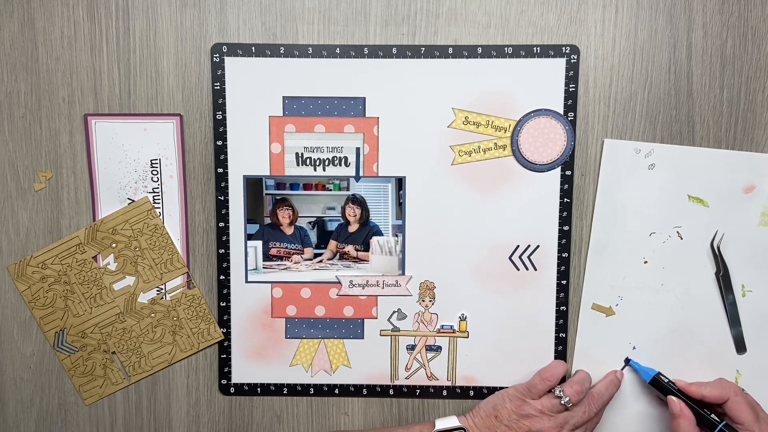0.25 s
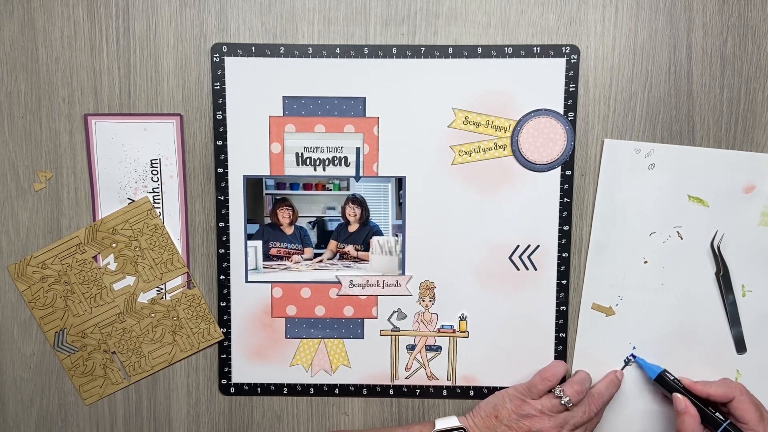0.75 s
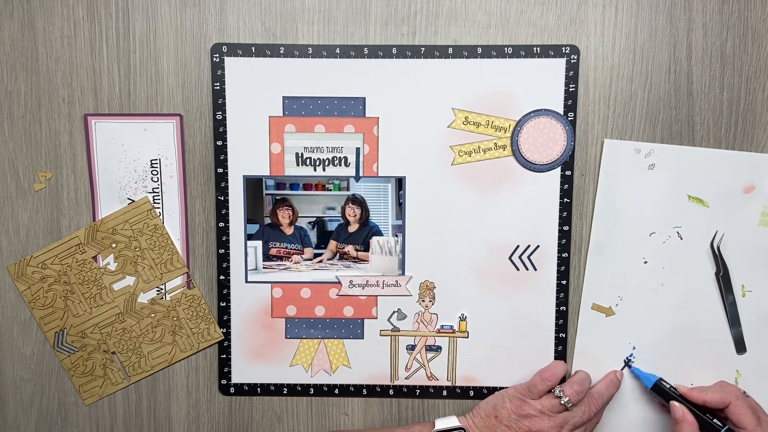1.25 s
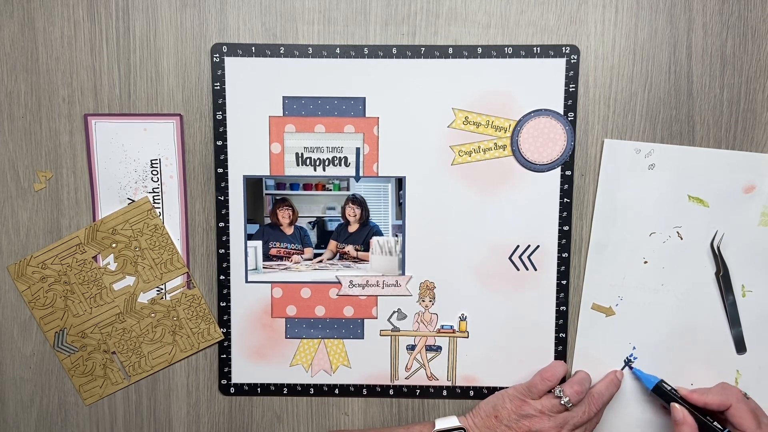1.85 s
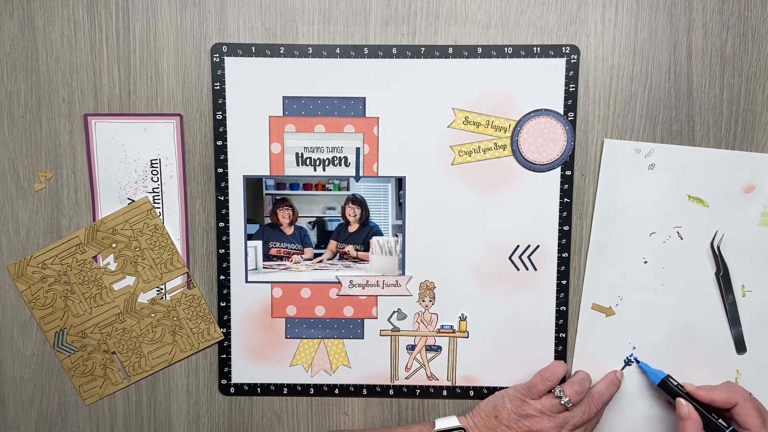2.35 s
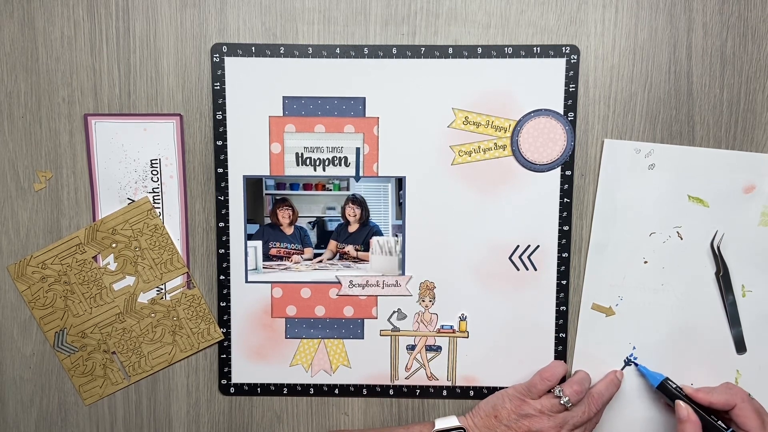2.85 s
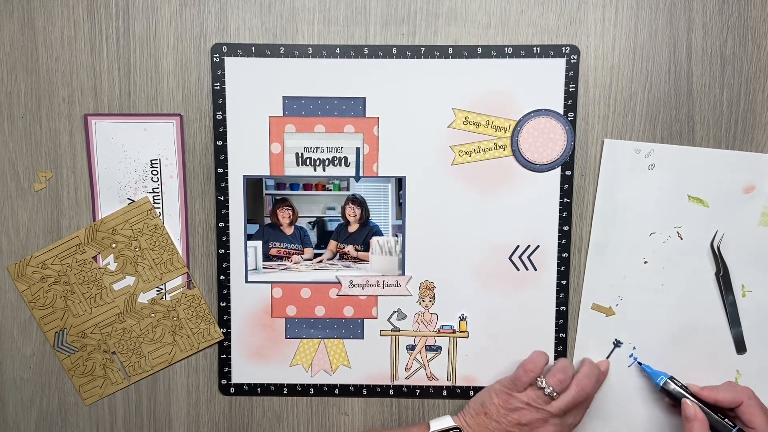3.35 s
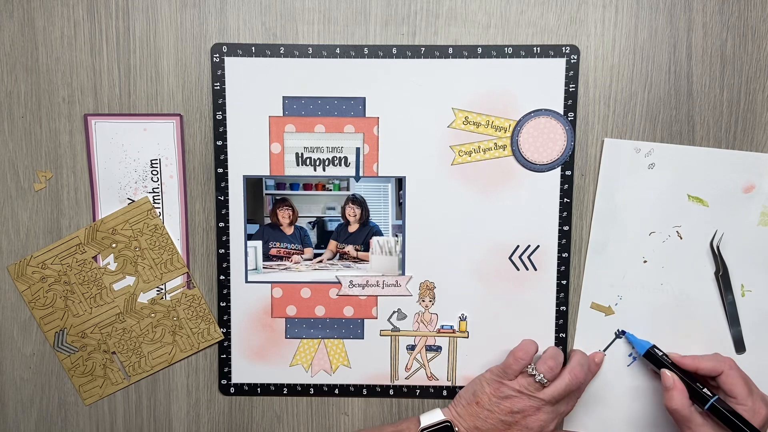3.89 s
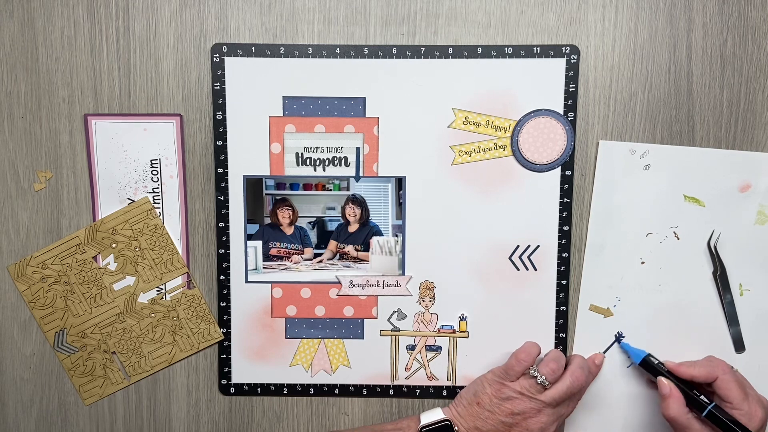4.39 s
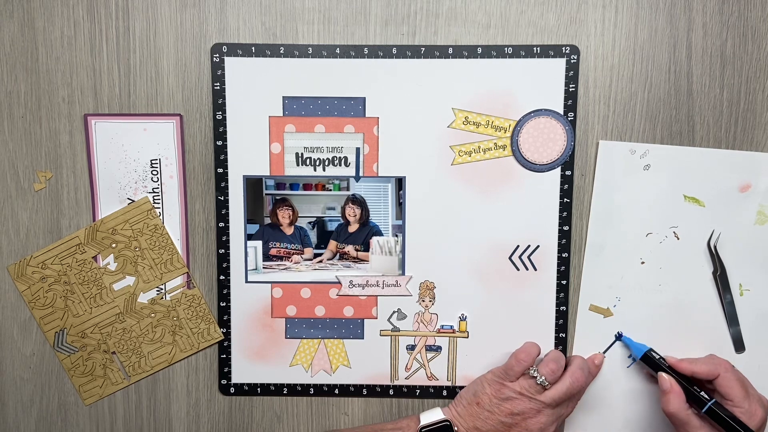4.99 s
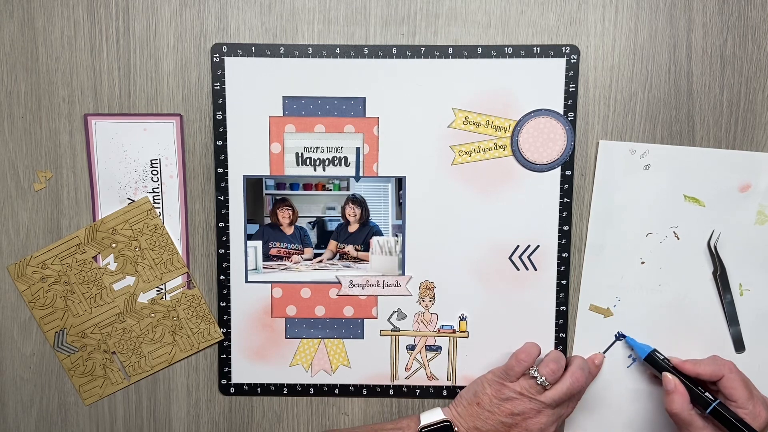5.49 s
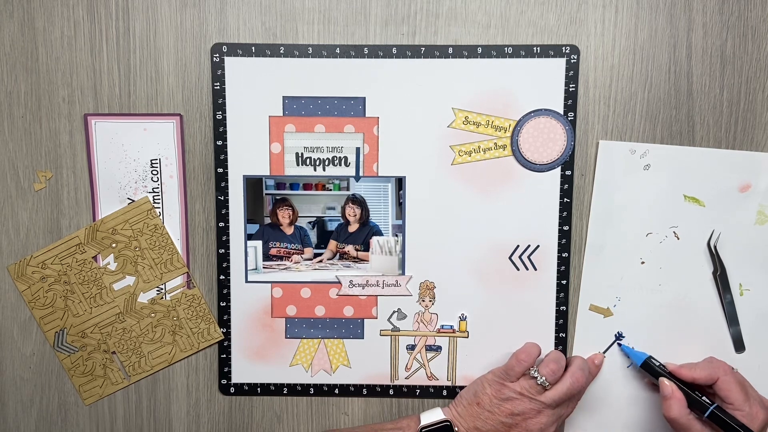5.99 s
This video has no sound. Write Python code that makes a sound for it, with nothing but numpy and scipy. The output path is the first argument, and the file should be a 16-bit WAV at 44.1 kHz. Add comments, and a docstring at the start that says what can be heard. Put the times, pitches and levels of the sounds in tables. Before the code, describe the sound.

A quiet small room, heard closely in stereo at a desk: a constant low hum near 120 Hz beats almost three times a second over soft ventilation rumble and faint hiss. From 0 to 2 s a felt tip dabs paper about five times a second, each a tiny dry scratch with gritty snags, some shaking the sheet, with low desk thuds and faint skin rubs. From 2 to 3 s the dabs weaken; a firmer one lands at 3.1 s, followed by light, bright strokes until 3.5 s. Around 3.55 to 4.1 s a hand drags the paper: dull rubbing, crackles and small snaps, clustered near 3.6 and 3.95 s. At 4.08 s one sharp plastic click stands out. From 4.3 to 4.95 s quick back-and-forth strokes hiss, roughly ten a second, fading to faint touches by 5.4 s. Separate scratches return from 5.55 s to the end at about 6.2 s.

```python
"""A felt marker colours a small paper cut-out on a sheet lying on a desk, in short dabs and a quick back-and-forth:
fibres catching on the paper hiss, snags ring the tip, firm dabs shake the sheet, and dull rubs lie beneath.
Midway a hand drags the paper along, which rubs, crackles and snaps, and the pen gives one sharp click.
Behind it two motors hum and beat against each other over ventilation rumble and hiss in the small room.
A closely spaced microphone pair listens, its stand carrying low thuds straight up from the desk."""
import sys
import numpy as np
from scipy import signal
from scipy.fft import rfft, irfft, next_fast_len
from scipy.io import wavfile

SR = 44100
rng = np.random.default_rng(int(sys.argv[2]) if len(sys.argv) > 2 else 0)


def materialize(psi):
    """Save the field psi as 16-bit PCM at rate SR to the path in sys.argv[1].

    A 1-D psi becomes a single channel; in a 2-D psi each row is a channel.
    """
    bounded = np.clip(np.atleast_2d(psi).T, -1, 1)
    quanta = np.round(bounded * 32767).astype(np.int16)
    wavfile.write(sys.argv[1], SR, quanta)


N = 274917
TIME = np.arange(N) / SR
SIZE = next_fast_len(N + SR // 2)
BINS_HZ = np.maximum(np.arange(SIZE // 2 + 1) * SR / SIZE, 1)


def from_db(db):
    """Decibels to gain."""
    return 10 ** (np.asarray(db) / 20)


def rms_one(x):
    """Scale to unit rms."""
    return x / np.sqrt(np.mean(x ** 2) + 1e-20)


def through(x, response):
    """Filter by a complex frequency response."""
    return irfft(rfft(x, SIZE) * response, SIZE)[..., :N]


def cut(x, hz, kind):
    """Second-order high- or low-pass."""
    return signal.sosfilt(signal.butter(2, hz, kind, fs=SR, output="sos"), x)


def coloured(x, points, skirt_db=14):
    """Shape by a (Hz, dB) spectrum that falls away per octave beyond its ends; rms 1."""
    hz, db = np.transpose(points)
    octave = np.log2(BINS_HZ)
    beyond = np.abs(octave - np.clip(octave, np.log2(hz[0]), np.log2(hz[-1])))
    shape_db = np.interp(octave, np.log2(hz), db) - skirt_db * beyond
    return rms_one(through(x, from_db(shape_db)))


def drift(per_s):
    """Random wander with spread about 1: straight lines between per_s random knots a second."""
    knots = rng.standard_normal(N // 20)
    return np.interp(TIME * per_s, np.arange(len(knots)), knots) * np.sqrt(1.5)


def bend(x, share, per_s):
    """Let the pitches in a sound wander by a small share."""
    position = np.cumsum(1 + share * drift(per_s)) % N
    return np.interp(position, np.arange(N), x)


def grains(per_s, spread_db):
    """Fibres let go at random moments with uneven force; rms 1."""
    force = from_db(spread_db * np.minimum(rng.exponential(1, N), 4))
    sign = rng.choice([-1, 1], N)
    return rms_one(force * sign * (rng.random(N) < per_s / SR))


def resonate(x, modes, struck=False):
    """Parallel resonances: unit gain on top, or unit ring height when struck, times each mode's level."""
    out = 0
    for hz, width, db in modes:
        radius, angle = np.exp(-np.pi * width / SR), 2 * np.pi * hz / SR
        b = np.array([1, 0, -1]) / 2 * (1 if struck else 1 - radius * radius)
        a = [1, -2 * radius * np.cos(angle), radius * radius]
        out = out + from_db(db) * signal.lfilter(b, a, x + 1e-18)
    return out


def contacts(rows, crumble, crumble_s):
    """A pulse for each contact, trailed by a short burst of micro-slips."""
    out, age = np.zeros(N), np.arange(SR // 20) / SR
    for s, db in rows:
        burst = crumble * rng.standard_normal(len(age)) * np.exp(-age / crumble_s)
        burst[0] = 1
        at = round(s * SR)
        out[at:at + len(age)] += from_db(db) * burst[:N - at]
    return out


def swell(start, length, attack, release):
    """Speed of one movement: rounded attack, hold, rounded release."""
    out, during = np.zeros(N), slice(*np.searchsorted(TIME, [start, start + length]))
    rise = (TIME[during] - start) / attack
    fall = (start + length - TIME[during]) / release
    out[during] = np.sin(np.pi / 2 * np.clip(np.minimum(rise, fall), 0, 1))
    return out


# spectrum of the ventilation rumble: f/Hz, relative level per Hz/dB
RUMBLE_COLOUR = [(22, -30), (38, -1), (58, -5.5), (75, 4.5), (95, 1.5), (150, -3), (190, -12.5), (300, -16),
                 (450, -23.5)]
# spectrum of the hiss shared by both microphones: f/Hz, relative level per Hz/dB
HISS_COLOUR = [(150, 1.5), (400, 5.5), (800, -5), (1300, -0.5), (2200, -16.5), (3500, -17.5), (5000, -19.5),
               (7000, -21.5), (10000, -23), (16000, -30.5)]
# spectrum of the hiss that differs between the microphones: f/Hz, relative level per Hz/dB
HISS_SIDE_COLOUR = [(40, -5.5), (120, -5.5), (220, -1), (400, 4), (750, 2), (1200, -0.5), (1900, -18.5),
                    (3000, -8), (6000, -45)]


def air(rumble_db=-60.5, hiss_db=-74.0, side_db=-74.0, gust_db=2, gust_below_hz=85, waver_db=1.2):
    """Ventilation rumble, central and gusty in its depths, under a faint hiss: wavering centre, steady sides."""
    rumble = from_db(rumble_db) * coloured(rng.standard_normal(N), RUMBLE_COLOUR)
    deep = through(rumble, 1 / (1 + (BINS_HZ / gust_below_hz) ** 8))
    rumble = rumble - deep + deep * from_db(gust_db * drift(8))
    mid = from_db(hiss_db) * coloured(rng.standard_normal(N), HISS_COLOUR) * from_db(waver_db * drift(8))
    side = from_db(side_db) * coloured(rng.standard_normal(N), HISS_SIDE_COLOUR)
    return rumble + mid + side * [[1], [-1]]


# steady hum tones, strongest first: f/Hz, rms level/dB before throb and waver
HUM_TONES = [(120.1, -48), (59.3, -67.5), (242, -77)]
BEAT_HZ, BEAT_CREST_S = 2.765, .06


def hum(second_db=-59.0, throb=0.058, waver_db=0.69):
    """Mains hum; a second motor runs slightly faster, so the two beat."""
    since = TIME - BEAT_CREST_S
    mains = sum(from_db(db) * np.cos(2 * np.pi * hz * since) for hz, db in HUM_TONES)
    second = from_db(second_db) * np.cos(2 * np.pi * (HUM_TONES[0][0] + BEAT_HZ) * since)
    # the beat has flat crests and narrow troughs
    shape = 1 - throb * np.cos(4 * np.pi * BEAT_HZ * since) / 2
    return np.sqrt(2) * (mains + second) * shape * from_db(waver_db * drift(8))


# the hands press the desk: t/s, level/dB before trim
DESK_PRESSES = [(.105, -57), (.33, -67), (.575, -53), (.78, -45.5), (.955, -46.5), (1.14, -54), (1.31, -57),
                (1.5, -46), (1.71, -47), (1.965, -57), (2.36, -61), (2.545, -55)]
# the desk's lowest mode: f/Hz, width/Hz, level/dB
DESK_LOWEST_MODE = [(49, 13, 1.5)]


def desk_thuds(thud_db=3, dull_hz=80):
    """The desk's lowest mode is carried straight up the microphone stand."""
    presses = contacts(DESK_PRESSES, crumble=0, crumble_s=1)
    ring = resonate(presses, DESK_LOWEST_MODE, struck=True)
    return from_db(thud_db) * cut(cut(ring, dull_hz, "low"), 33, "high")


# the pen's click: t/s, level/dB before trim
CLICK_BLOW = [(4.0811, -6)]
# broad resonances of the pen: f/Hz, width/Hz, level/dB
PEN_RESONANCES = [(3270, 900, -4), (5600, 990, 1), (7000, 1200, -4), (8990, 1200, 1), (11200, 1500, -2.5),
                  (13540, 1800, -1)]


def pen_click(crack_hz=7000, gain_db=-0.5):
    """Hard plastic: a broadband snap, lifted by broad resonances that die within milliseconds."""
    blow = contacts(CLICK_BLOW, crumble=.075, crumble_s=.0022)
    snap = signal.sosfilt(signal.butter(1, crack_hz, "high", fs=SR, output="sos"), blow)
    for mode in PEN_RESONANCES:
        snap = snap + resonate(snap, [mode])  # each lifts the sound left by the one before
    return from_db(gain_db) * snap


# faint rubs and scuffs of skin on paper: centre t/s, length t/s, pitch f/Hz, width/Hz, level/dB before trim
SKIN_RUBS = [(0.25, .1, 1290, 400, -75.5), (0.299, .035, 1260, 220, -65), (0.398, .14, 2600, 696, -71),
             (0.427, .22, 328, 594, -66), (0.48, .12, 1400, 500, -72.5), (0.628, 0.023, 1380, 170, -69),
             (0.68, .1, 1400, 250, -77.5), (0.97, .12, 358, 248, -68.5), (1.868, .035, 1367, 110, -72),
             (1.938, .1, 1470, 300, -73), (2.59, 0.041, 1370, 400, -66.5), (2.818, 0.045, 1310, 350, -71.5),
             (3.892, .05, 700, 200, -66.5), (4.01, .06, 594, 199, -67.5), (4.15, .14, 650, 600, -72),
             (5.368, 0.085, 1250, 498, -70.5), (5.43, .14, 1380, 900, -76), (5.724, .06, 1240, 400, -74)]


def rubs(rub_db=-1.5):
    """Skin that sticks and slips: a fingertip scuffs briefly around one pitch, the palm rubs broad and low."""
    out, friction = np.zeros(N), grains(per_s=3000, spread_db=2)
    for centre, length, hz, width, db in SKIN_RUBS:
        mode, near = [(hz, width, 0)], np.abs(TIME - centre) < .5
        speed = swell(centre - length / 2, length, length / 2, length / 2)[near]
        tone = rms_one(resonate(resonate(friction[near], mode), mode))
        out[near] += from_db(db + rub_db) * speed * tone
    return out


# paper snaps under the fingers: t/s, level/dB and bright crack level/dB, both before trims
PAPER_SNAPS = [(3.578, -66, -35.5), (3.593, -39.5, -28), (3.597, -38, -50), (3.643, -50, -40),
               (3.678, -65, -42), (3.737, -47.5, -49), (3.747, -46, -46), (3.775, -39.5, -45),
               (3.801, -43, -51), (3.888, -51, -57), (3.936, -38, -42), (3.94, -39.5, -27.5),
               (3.947, -47.5, -28), (3.95, -41, -38)]
# resonances of the paper, heard in snaps and crackle: f/Hz, width/Hz, relative level/dB
PAPER_RESONANCES = [(1264, 97, -6.5), (1512, 410, 5.5), (2300, 350, 5.5), (2800, 400, 0.5), (3840, 240, -8),
                    (5100, 1000, -3.5), (6170, 190, -10)]


def snaps(snap_db=-18, crack_db=-3, vary_db=3, dull_hz=6500):
    """The paper buckles: each snap is a crack and rings the modes with strengths of its own."""
    strengths = vary_db * rng.standard_normal((len(PAPER_SNAPS), len(PAPER_RESONANCES)))
    rings = 0
    for mode, extras in zip(PAPER_RESONANCES, strengths.T):
        rows = [(s, db + extra) for (s, db, _), extra in zip(PAPER_SNAPS, extras)]
        buckles = contacts(rows, crumble=0.17, crumble_s=0.003)
        rings = rings + resonate(buckles, [mode], struck=True)
    cracks = contacts([(s, db) for s, _, db in PAPER_SNAPS], crumble=0.081, crumble_s=0.0028)
    cracks = cut(cut(cracks, 2200, "high"), 8000, "low")
    return from_db(snap_db) * cut(rings, dull_hz, "low") + from_db(crack_db) * cracks


# dull rubs on the paper: hand shifts, the two hardest dragging the cut-out along, and at 4.36 s
# the marker's low body under the back-and-forth: start t/s, length t/s, level/dB
DULL_RUBS = [(0.297, 0.41, -82), (0.574, 0.29, -78.5), (1.832, 0.22, -77.5), (2.24, 0.71, -80.5),
             (3.302, 0.22, -78), (3.556, 0.34, -70.5), (3.844, 0.3, -69), (4.36, 0.94, -80.5),
             (5.28, 0.14, -75)]
# spectrum of the dull rub: f/Hz, relative level per Hz/dB
RUB_COLOUR = [(200, 6.5), (480, -5.5), (900, -2.5), (1500, -4.5), (2000, -3.5), (2600, -9.5), (3600, -10),
              (6000, -27), (12000, -46.5)]
# resonances that sing under a hard push: f/Hz, width/Hz, relative level/dB
SINGING_MODES = [(640, 280, 2), (1090, 200, -7.5), (1490, 180, 5.5), (1950, 130, -3.5), (2650, 300, -2.5)]
# soft bumps of the hand on the desk: t/s, level/dB before trim
HAND_BUMPS = [(.745, -82), (.96, -75.5), (1.96, -70), (3.418, -64.5), (3.527, -74.5), (3.65, -75),
              (3.918, -70)]
# desk resonances under those bumps: f/Hz, width/Hz, level/dB before trim
DESK_RESONANCES = [(335.4, 33, 14.5), (473, 33, 14.5), (580, 77, -13)]
RUB_ATTACK_S, RUB_RELEASE_S, RESTING_HAND_DB = 0.073, 0.1, -78


def dull_rubs_and_bumps(crackle_db=-3, drag_db=-2, shift_db=4, bump_db=-3):
    """Hand and marker rub dully on the paper, which crackles when pushed hard; the hand bumps the desk."""
    rubbing = coloured(grains(per_s=3500, spread_db=2.6) * from_db(2.0 * drift(60)), RUB_COLOUR)
    efforts = [from_db(db) * swell(start, length, RUB_ATTACK_S, RUB_RELEASE_S)
               for start, length, db in DULL_RUBS]
    effort = np.sqrt(from_db(RESTING_HAND_DB) ** 2 + sum(each ** 2 for each in efforts))
    crackle = resonate(grains(per_s=90, spread_db=2.5), PAPER_RESONANCES)
    crackle = rms_one(cut(crackle, 6500, "low"))
    # the resonances take turns as the paper bends
    singing = sum(resonate(rubbing, [mode]) * from_db(shift_db * drift(22)) for mode in SINGING_MODES)
    singing = rms_one(bend(singing, share=.035, per_s=16))
    # crackle and singing grow with the square of the effort, so hard pushes bring them out
    strained = (from_db(crackle_db) * crackle + from_db(drag_db) * singing) * effort / effort.max()
    bumps = resonate(contacts(HAND_BUMPS, crumble=0.054, crumble_s=0.0077), DESK_RESONANCES, struck=True)
    return effort * (rubbing + strained) + from_db(bump_db) * cut(bumps, 500, "low")


# the tip snags on the paper's tooth: t/s, level/dB before trim
TIP_SNAGS = [(.064, -39), (.333, -31), (.539, -33), (.725, -33), (.74, -26.5), (.922, -38), (.929, -40),
             (1.119, -28), (1.286, -31), (1.302, -31), (1.311, -42), (1.691, -32), (1.697, -32),
             (1.914, -43), (2.324, -38), (2.498, -39), (2.534, -39), (3.114, -27.5), (3.123, -25.5),
             (5.583, -33), (5.744, -35), (6.163, -42), (6.205, -37)]


def catches(catch_db=-11, snap_db=-6):
    """The tip snags and lets go in a gritty burst that rings it."""
    slips = contacts(TIP_SNAGS, crumble=0.21, crumble_s=0.0021)
    # f/Hz, width/Hz, level/dB before trim
    tip_modes = [(2240, 540, -21), (4000, 110, -22.5), (5000, 170, -17), (6240, 350, -13.5)]
    rings = resonate(slips, tip_modes, struck=True)
    return from_db(catch_db) * (rings + from_db(snap_db) * cut(slips, 3300, "high"))


DAB_RISE_SHARE = 0.6  # of a dab's length, spent speeding up
DAB_SWELL_DB, DAB_TOUCH_S = 13.5, 0.0024  # growth from landing to crest; time to land or lift


def dab(crest, length):
    """Friction of one dab: the tip lands, bites harder up to a pointed crest, eases off and lifts."""
    start = crest - DAB_RISE_SHARE * length
    friction = swell(start, length, DAB_TOUCH_S, DAB_TOUCH_S)
    touching = friction > 0
    away = np.interp(TIME[touching], [start, crest, start + length], [1, 0, 1])
    friction[touching] *= from_db(-DAB_SWELL_DB * away)
    return friction


# dabs on the sheet, about five a second:
# crest t/s, length t/s, scratch level/dB, paper body level/dB before trim
TIP_DABS = [(0.077, 0.035, -56.5, -77), (0.103, 0.027, -57, -72), (0.337, 0.017, -52, -65),
            (0.548, 0.043, -61, -67), (0.744, 0.065, -61, -65.5), (0.932, 0.04, -54.5, -63),
            (1.12, 0.069, -58, -90), (1.305, 0.066, -58, -83), (1.493, 0.072, -60, -70),
            (1.698, 0.042, -55, -79), (1.915, 0.042, -60, -74), (1.94, 0.022, -63, -75),
            (2.121, 0.034, -64, -87), (2.325, 0.084, -64.5, -72), (2.499, 0.05, -61, -88),
            (2.536, 0.051, -60.5, -84), (2.709, 0.032, -65, -93), (2.751, 0.037, -65, -81),
            (2.779, 0.022, -65.5, -80), (2.876, 0.076, -72, -78), (3.008, 0.036, -72, -92),
            (3.126, 0.04, -51, -63)]


def sheet_body(body_db=-2):
    """A firm dab also shakes the sheet, which answers lower than the scratch."""
    press = sum(from_db(db) * dab(crest, length) for crest, length, _, db in TIP_DABS)
    # f/Hz, width/Hz, relative level/dB
    sheet_modes = [(1020, 150, -11.5), (1630, 130, 10), (2094, 230, 13.5), (2800, 1200, -8)]
    body = resonate(grains(per_s=2700, spread_db=3.5), sheet_modes)
    return from_db(body_db) * press * rms_one(cut(body, 3300, "low"))


# longer strokes, with a quick back-and-forth over the cut-out after the click:
# start t/s, length t/s, level/dB
TIP_STROKES = [(3.274, 0.14, -60.5), (3.37, 0.09, -68.5), (3.467, 0.079, -64.5), (3.97, 0.073, -63.5),
               (4.275, 0.082, -53.5), (4.358, 0.057, -56.5), (4.401, 0.049, -56), (4.452, 0.098, -53.5),
               (4.552, 0.087, -52.5), (4.645, 0.094, -54.5), (4.737, 0.087, -52), (4.835, 0.074, -56.5),
               (4.915, 0.054, -60), (5.026, 0.05, -68.5), (5.086, 0.058, -64.5), (5.199, 0.05, -69.5),
               (5.25, 0.053, -67.5), (5.349, 0.067, -73), (5.557, 0.08, -57.5), (5.698, 0.022, -61),
               (5.736, 0.081, -59), (5.927, 0.053, -61), (5.965, 0.028, -52), (6.157, 0.032, -55)]
STROKE_ATTACK_S, STROKE_RELEASE_S = 0.026, 0.028


def tip_power():
    """Friction power of all dabs and strokes."""
    dabs = sum((from_db(db) * dab(crest, length)) ** 2 for crest, length, db, _ in TIP_DABS)
    strokes = sum((from_db(db) * swell(start, length, STROKE_ATTACK_S, STROKE_RELEASE_S)) ** 2
                  for start, length, db in TIP_STROKES)
    return dabs + strokes


def surface(friction, colour, peaks, ring_db, wander_db, bend_share):
    """Friction coloured by one surface, with narrow peaks that come, go and shift in pitch."""
    scratch = coloured(friction, colour)
    rings = sum(resonate(scratch, [peak]) * from_db(wander_db * drift(12)) for peak in peaks)
    return rms_one(scratch + from_db(ring_db) * bend(rings, bend_share, 14))


# colour of the tip on the bare sheet: f/Hz, relative level per Hz/dB
SHEET_COLOUR = [(900, -8), (1500, -10), (2100, -10), (3400, -6), (4050, -3.5), (4400, -4.5), (5100, 3.5),
                (6200, 1.5), (6800, -5), (9000, -12.5), (10000, -14.5), (15500, -21)]
# narrow resonances of the tip on the bare sheet: f/Hz, width/Hz, relative level/dB
SHEET_PEAKS = [(4070, 210, 4), (4920, 150, -1.5), (5240, 180, -3), (5840, 120, -11), (10040, 440, -6)]
# colour of the tip on the cut-out: f/Hz, relative level per Hz/dB
CUTOUT_COLOUR = [(900, -17.5), (1500, -11), (2500, -11), (3300, -8), (4100, -3.5), (4700, 2), (5400, 4),
                 (6400, 3.5), (8400, -15), (11000, -12.5), (15500, -20.5)]
# narrow resonances heard in strokes on the cut-out, the topmost being the microphone's treble peak:
# f/Hz, width/Hz, relative level/dB
CUTOUT_PEAKS = [(3300, 350, 0.5), (4620, 200, 0), (4970, 160, -8), (5400, 76, -3), (9100, 170, 5),
                (11000, 350, -14.5), (15100, 600, -0.5)]
# lift of the treble against the rest of the scratch: t/s, level/dB
SCRATCH_TREBLE = [(0, 4.5), (1.25, 7), (2.75, 3), (3.2, 8), (3.28, 13), (3.5, 11), (4.25, 1), (4.6, 3.5),
                  (5.6, 0), (6.2, -4.5)]
CUTOUT_FROM_S = 3.7


def marker(sheet_rough_db=3, cutout_rough_db=1.86, ragged_db=0.47, bright_hz=8000):
    """Each stroke swells with the tip's speed; fibres catching on the paper make the hiss."""
    # the sheet's tooth makes the friction flutter; the cut-out is smoother card
    coarse = grains(per_s=12000, spread_db=3.0) * from_db(sheet_rough_db * drift(220))
    fine = grains(per_s=25000, spread_db=0.5) * from_db(cutout_rough_db * drift(260))
    sheet = surface(coarse, SHEET_COLOUR, SHEET_PEAKS, ring_db=4.5, wander_db=3.5, bend_share=.018)
    cutout = surface(fine, CUTOUT_COLOUR, CUTOUT_PEAKS, ring_db=4.5, wander_db=-0.5, bend_share=0.016)
    scratch = np.where(TIME < CUTOUT_FROM_S, sheet, cutout) * from_db(ragged_db * drift(70))
    # a light touch on the very point moves the energy up into the treble, at the same overall level
    treble = through(scratch, 1 / (1 + (bright_hz / BINS_HZ) ** 10))
    lift = from_db(np.interp(TIME, *np.transpose(SCRATCH_TREBLE)))
    share = np.mean(treble ** 2)
    mixed = scratch - treble + lift * treble
    return mixed * np.sqrt(tip_power() / (1 - share + share * lift ** 2))


# first reflections, from desk and walls: delay t/s, level/dB
FIRST_REFLECTIONS = [(.0029, -13), (.0151, -16), (.0165, -21)]
ROOM_T60_S = 0.19


def room(x, wet_db, side_db=-11, gap_s=0.011, uneven_db=3):
    """A few first reflections, then a small room's uneven tail, mostly shared by the two microphones."""
    age = np.arange(SR // 2) / SR
    clumps = from_db(uneven_db * drift(700)[:len(age)])
    decay = from_db(-60 * age / ROOM_T60_S) * np.clip(age / gap_s, 0, 1) ** 6
    tails = rng.standard_normal((2, len(age))) * clumps * decay
    tails /= np.sqrt(np.sum(tails ** 2, axis=1, keepdims=True))
    mid, side = through(x, rfft(tails, SIZE))
    # the tail is wider below about 2500 Hz
    side = through(side, from_db(side_db) * (1 + 3 / (1 + (BINS_HZ / 2500) ** 2)))
    early = sum(from_db(db) * np.pad(x, (round(s * SR), 0))[:N] for s, db in FIRST_REFLECTIONS)
    return x + early + from_db(wet_db) * (mid + side * [[1], [-1]])


# phase by which the left microphone leads, none in the bass: f/Hz, phase/rad
LEFT_LEAD = [(1900, 0), (2900, 1.1), (5000, .5), (7400, 3.1), (9900, 6.15), (11000, 6.35), (13400, 9.4),
             (16000, 12.3)]


def scene():
    """Desk sounds in the room, the rubbed paper with more of it; the left microphone leads above the bass."""
    tip = room(marker() + sheet_body() + catches(), wet_db=-9.5)
    paper = room(dull_rubs_and_bumps() + snaps() + rubs(), wet_db=-7.0)
    click = room(pen_click(), wet_db=-9.5)
    both = tip + paper + click + desk_thuds() + air() + hum()
    lead = np.interp(BINS_HZ, *np.transpose(LEFT_LEAD))
    return through(both, np.exp(1j * lead * np.array([[0], [-1]])))


def record(dry, cutoff_hz=16300):
    """The top is cut steeply."""
    return signal.sosfilt(signal.ellip(10, .2, 80, cutoff_hz, fs=SR, output="sos"), dry)


dry = scene()
out = record(dry)
materialize(out)
```